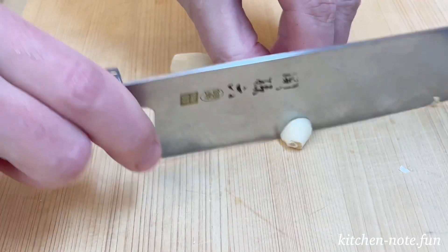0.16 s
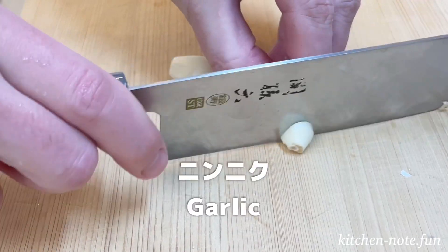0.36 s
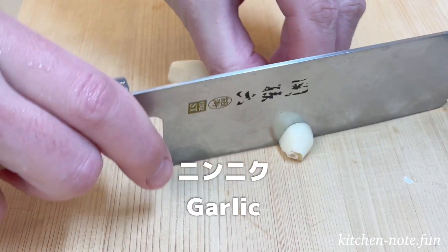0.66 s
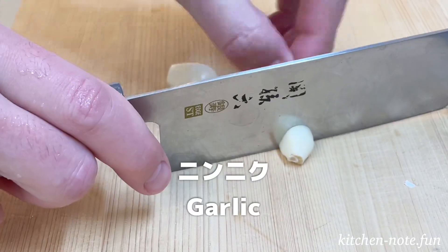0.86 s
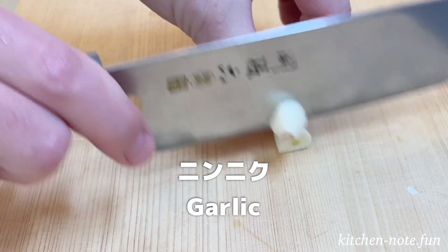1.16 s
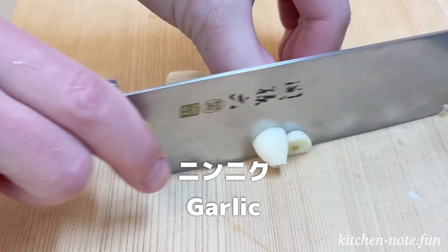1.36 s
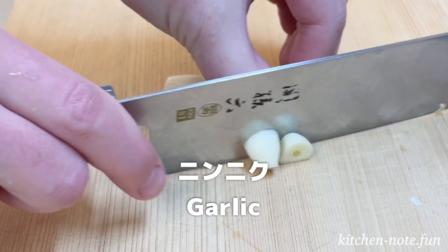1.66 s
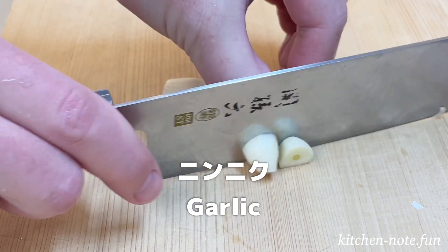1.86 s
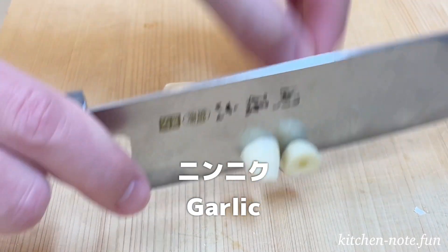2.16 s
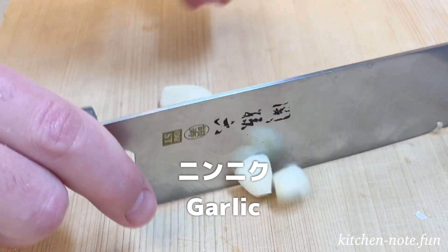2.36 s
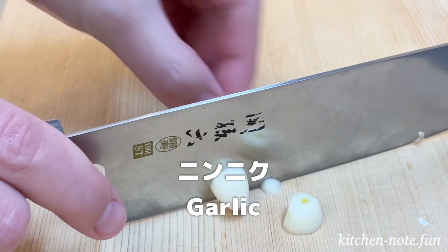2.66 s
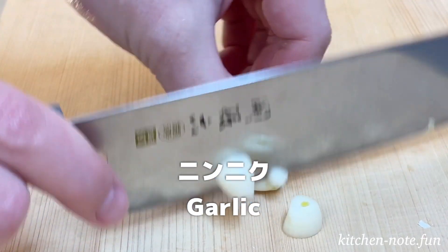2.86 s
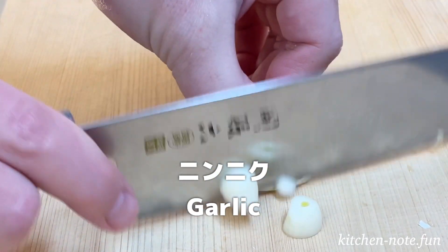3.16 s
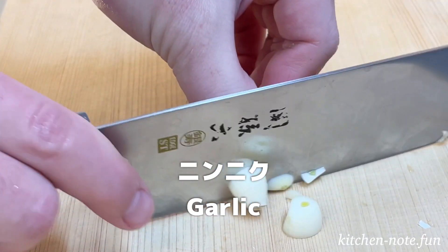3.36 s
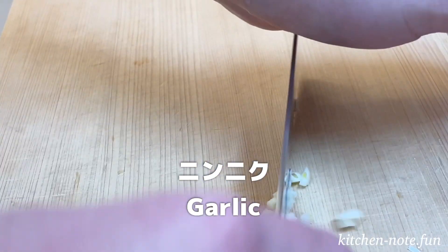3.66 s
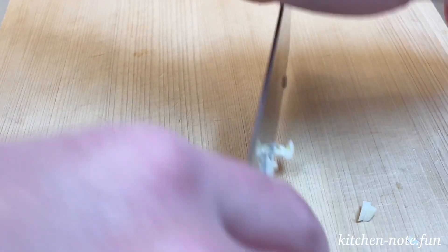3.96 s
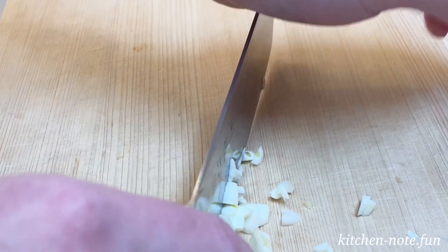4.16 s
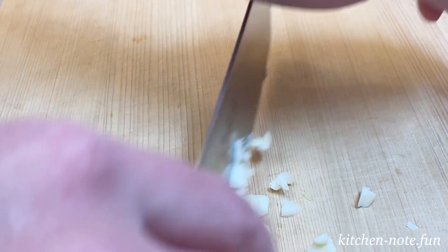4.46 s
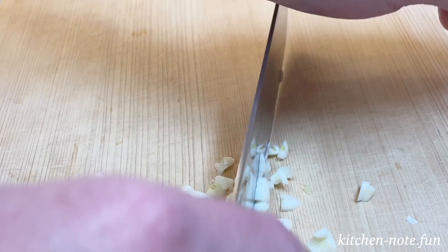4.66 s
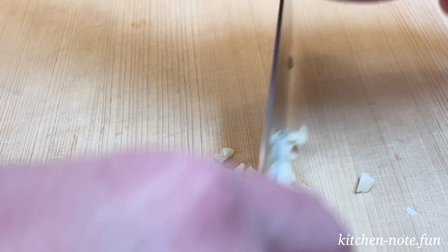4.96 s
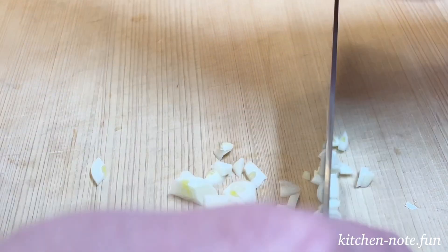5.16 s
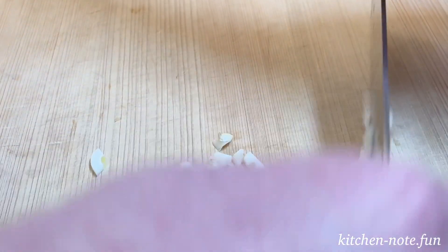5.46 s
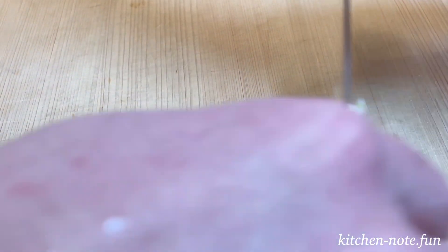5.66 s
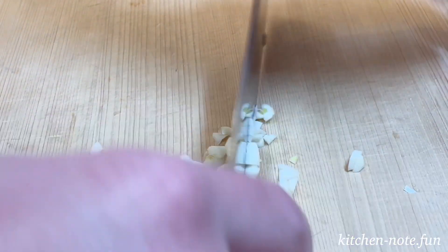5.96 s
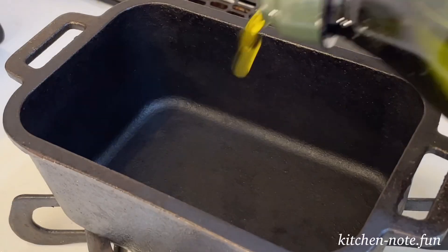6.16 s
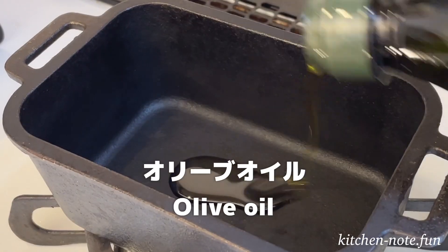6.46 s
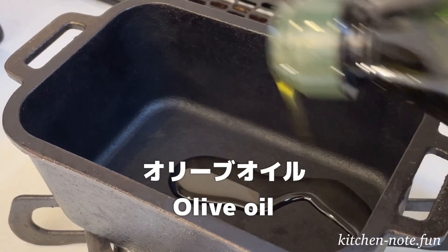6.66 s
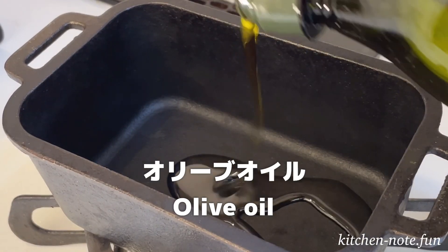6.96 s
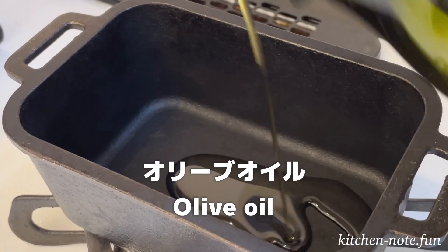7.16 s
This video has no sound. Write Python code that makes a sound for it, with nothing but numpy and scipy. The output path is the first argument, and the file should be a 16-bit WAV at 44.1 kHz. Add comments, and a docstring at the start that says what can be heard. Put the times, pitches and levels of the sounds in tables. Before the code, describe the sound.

Close to the microphone in a small kitchen, a knife slices garlic on a wooden board. Each uneven stroke gives a light snap and crunch, then a sharp, briefly ringing knock, with small wet ticks in between. The strokes turn into steadier, deeper mincing. Near the end the chopping cuts to a faint stove hum with a barely audible trickle of oil. A very faint high whine runs throughout.

```python
"""In a small kitchen, close to the microphone, a knife slices and then minces garlic on a wooden board.
The skin snaps, the clove crunches, and the blade knocks on the board and makes it ring.
Wet pieces tick against the steel, and fingers rub the damp clove. Then the scene changes to a
humming stove, where oil runs almost silently from a bottle into a pan.
A faint electrical whine goes on throughout."""
import sys
import numpy as np
from scipy import signal
from scipy.fft import rfft, irfft, next_fast_len
from scipy.io import wavfile
from scipy.ndimage import uniform_filter1d, minimum_filter1d

SR = 44100
rng = np.random.default_rng(int(sys.argv[2]) if len(sys.argv) > 2 else 0)


def store_pcm(level_fs):
    """Save levels as 16-bit WAV."""
    pcm = np.round(np.clip(level_fs, -1, 1) * 32767).astype(np.int16)
    wavfile.write(sys.argv[1], SR, np.atleast_2d(pcm).T)


N = 321923

# Knife strokes. Each row: landing time in seconds, force in dB, bite (treble of a flat landing) in dB,
# blade buzz in dB, seconds spent in the clove, skin snap in dB, crunch near the board in dB.
STROKES = [(-0.14, 0.5, 6, -12, 0.027, -43, -45), (0.0734, 0, 5, -12, 0.048, -43.5, -32.5),
           (0.3014, 0.2, 3, -11.5, 0.058, -55, -56.5), (0.5719, -1.5, 1, -21, .057, -22, -46),
           (1.3318, 0, 2.5, -15, 0.048, -28, -39), (1.618, 0.5, 1, -11, 0.045, -28.5, -40),
           (2.3327, -1, 2.5, -4.5, 0.013, -54, -28), (3.01, -0.5, 2.5, -1.5, 0.012, -50, -21.5),
           (3.2686, 1, 0, -1.5, 0.047, -24, -31.5), (3.4907, -1.5, 0.5, 0, 0.05, -26, -32),
           (3.8021, -3, -7, -4, .025, -27, -43), (4.0908, 3.5, -1, -11, .040, -60, -35.5),
           (4.3423, 3, -3, -24, 0.0096, -57.5, -50), (4.5834, -1, -8, -12, .015, -34, -42),
           (4.8356, -0.4, -5, -11, .020, -42, -39.5), (5.1515, -3.5, 0.5, -11, 0.025, -43, -38.5),
           (5.476, 2, 4, -1.5, 0.024, -46, -44.5), (5.715, 1, -6.5, -18, 0.0075, -59, -50),
           (5.923, -6.5, -8.5, -19, 0.022, -57, -45)]
# The tones of the board on its counter. A ring time is how long a sound takes to fade by 60 dB.
# Each row: pitch in Hz, ring time in seconds, level in dB when slicing, level in dB when mincing.
BOARD_TONES = [(72.8, 0.58, -36.5, -26), (95.5, 0.15, -24.5, -17.5), (118.3, .55, -34, -24.5),
               (150.1, 0.12, -20, -15.5), (209.3, 0.48, -27.5, -27), (230.6, 0.15, -20.5, -15.5),
               (268.6, 0.22, -22.5, -19.5), (332.7, 0.059, -15.5, -14.5), (350.5, 0.59, -34, -38),
               (420.2, 0.23, -27, -23), (466, 0.24, -30, -22.5), (489, .12, -18.5, -16),
               (613.3, 0.22, -41, -27), (693, 0.032, -21.5, -11.5), (844, 0.45, -29.5, -36.5),
               (875, 0.28, -27.5, -28.5), (935.3, 0.033, -3.5, -1.5), (943, 0.17, -19.5, -20),
               (1055.6, 0.12, -18.5, -20), (1145, .04, -9.5, -16), (1321, .017, 4.5, -7.5),
               (1337, 0.14, -19, -40), (1380, 0.22, -26, -36.5), (1506, 0.085, -21.5, -26),
               (1810, 0.016, -32.5, -16.5), (1878, 0.055, -20, -52.5), (2307, 0.028, -18, -19),
               (2690, 0.014, -28, -25), (3690, .1, -39.5, -45.5), (4500, 0.096, -44, -39.5)]
# Tones of wood and blade, so crowded that they blur into noise.
# Each row: frequency in Hz, level in dB when slicing, level in dB when mincing.
CROWDED_TONES = [(58.7, -30.5, -17), (195, -6.5, -6), (512, -5.5, -1), (930, 7, 4.5), (1326, -2.5, -10),
                 (2080, -3.5, -6), (2910, -17.5, -12.5), (4660, -21.5, -22.5), (7900, -33.5, -32.5),
                 (10100, -34, -38.5), (15640, -52.5, -51)]
# The kitchen's echo. Each row: frequency in Hz, dB added to the crowded tones, ring time in seconds.
KITCHEN_ECHO = [(59, 5, 0.644), (191, -5, 0.51), (463, -6.5, .36), (892, -18.5, 0.39), (1373, -9.5, 0.32),
                (1850, -14.5, 0.23), (4750, -13, .26), (14000, -15.5, 0.2)]
# The tone colour of the crunch. Each row: frequency in Hz, level in dB.
CRUNCH_COLOUR = [(150, -17.5), (700, 11), (1300, 12), (2200, 4.5), (4500, 0.5), (7000, -1), (10500, 0),
                 (12500, -11.5), (15500, -4.5)]
# Wet pieces touch the steel. Each row: start in seconds, level in dB, knock in dB relative to the tick.
WET_TICKS = [(0.6494, -32.5, -26), (0.667, -28.5, 0.5), (1.134, -48, -20), (1.497, -42, -8),
             (1.866, -22.5, -7), (2.776, -40, 4), (3.5636, -38, -8), (3.8225, -33, 10), (5.775, -25.5, -12),
             (5.9913, -32.5, -5)]
# Hand and knife settle. Each row: start in seconds, level in dB, click in dB relative to the bump.
BOARD_NUDGES = [(0.906, -38.5, -6), (2.087, -30, -13.5), (2.798, -38.5, -6), (3.658, -32.5, -10)]
# The tones of the steel blade. Each row: pitch in Hz, level in dB, ring time in seconds.
BLADE_TONES = [(2900, -53, 0.79), (6465, -51.5, 0.1), (7930, -51, .095), (8820, -43, 0.13),
               (9120, -44.5, .085), (11500, -59, 0.084)]
# The background hush at the board and at the stove. Each row: frequency in Hz, relative level in dB.
ROOM_COLOUR = [(20, -37.5), (45, -9), (80, 2), (135, 3.5), (170, -14.5), (220, 2.5), (320, -9.5),
               (650, -14.5), (1200, -13), (1600, -18.5), (3000, -22), (5500, -34), (8000, -43),
               (16000, -48.5)]
STOVE_COLOUR = [(20, -38), (48, -22.5), (72, -1.5), (125, -12), (165, -14), (220, -8.5), (350, -17.5),
                (1200, -19.5), (3000, -29.5), (5500, -39.5), (7000, -47), (16000, -55.5)]
# The stove's electrical hum. Each row: pitch in Hz, level in dB.
HUM_TONES = [(100.1, -43.5), (200.2, -60), (1168, -63.5), (3636, -78)]
# Rubs against the clove. Each row: start in seconds, length in seconds, level in dB.
CLOVE_RUBS = [(1.03, .17, -65), (1.37, 0.24, -66), (2.47, 0.29, -56), (2.766, 0.069, -47.5)]

MINCE_FROM_S, STOVE_FROM_S, OIL_FROM_S = 3.65, 6.066, 6.34
TIME = np.arange(N) / SR


def amp(db):
    """Turn decibels into a number to multiply by."""
    return 10 ** (np.asarray(db) / 20)


def unit(x):
    """Scale a sound to an average (rms) level of 1."""
    return x / np.sqrt(np.mean(x ** 2) + 1e-20)


def peaked(x):
    """Scale a sound so that its peak is 1."""
    return x / np.abs(x).max()


def along(points, hz):
    """Read between (Hz, value) points, with octaves evenly spaced."""
    freqs, values = np.transpose(points)
    return np.interp(np.log(hz + 1), np.log(freqs + 1), values)


def colour(x, points):
    """Turn bass and treble up or down to follow (Hz, dB) points."""
    size = 2 * next_fast_len(len(x) // 2 + 4096)
    cepstrum = irfft(np.log(amp(along(points, np.fft.rfftfreq(size, 1 / SR)))))
    # this fold keeps the filter from ringing before a sound starts
    cepstrum[1:size // 2] *= 2
    cepstrum[size // 2 + 1:] = 0
    return irfft(rfft(x, size) * np.exp(rfft(cepstrum)))[:len(x)]


def ring(t, ring_s):
    """A fade that falls by 60 dB in ring_s seconds."""
    return np.exp(-np.log(1000) * t / ring_s)


def add(track, s, sound):
    """Mix a sound into the track at s seconds."""
    start = round(s * SR)
    sound, start = sound[max(-start, 0):], max(start, 0)
    track[start:start + len(sound)] += sound[:N - start]


def crackle(count):
    """Noise made of half-millisecond bursts of unequal size."""
    sizes = amp(3 * np.minimum(rng.exponential(size=count // 24 + 1), 4))
    return unit(rng.standard_normal(count) * np.repeat(sizes, 24)[:count])


def hush(points, db):
    """Steady background noise with the given tone colour."""
    return amp(db) * unit(colour(rng.standard_normal(N), points))


def whine(hz=13330, width_hz=130):
    """A thin electrical whine: a narrow band of noise, high and steady."""
    size = next_fast_len(N)
    band = np.exp(-((np.fft.rfftfreq(size, 1 / SR) - hz) / width_hz) ** 2)
    return amp(-87) * unit(irfft(rfft(rng.standard_normal(size)) * band, size)[:N])


def board_ring(t, mincing, scatter_db, rise_cycles):
    """The struck board rings; low tones travel slowly through the wood, so they build up last."""
    hz, ring_s, *levels = np.transpose(BOARD_TONES)[:, :, None]
    gain = amp(levels[mincing] + scatter_db * rng.standard_normal(hz.shape))
    signs = (-1) ** np.arange(len(hz))[:, None]
    rise = 1 - np.exp(-t * hz / rise_cycles)
    return np.sum(gain * signs * np.sin(2 * np.pi * hz * t) * ring(t, ring_s) * rise, axis=0)


def echo_tail(count):
    """The kitchen's echo: noise in which each frequency fades at its own speed."""
    hz, t, spectrum = signal.stft(rng.standard_normal(count), SR, nperseg=256)
    ring_s = along(np.array(KITCHEN_ECHO)[:, ::2], hz)[:, None]
    return signal.istft(spectrum * amp(-60 * t / ring_s), SR)[1][:count]


def blade_buzz(t):
    """After landing, the thin blade chatters on the wood for a few milliseconds."""
    swell = np.maximum(t - .0015, 0) / 0.0032
    chatter = rng.standard_normal(len(t)) * swell * np.exp(1 - swell)
    return colour(chatter, [(900, -19), (2400, -19), (4000, -17), (7500, -23.5), (11000, -35),
                            (13000, -47.5), (16000, -42)])


def chops():
    """The edge hits the wood with a crack; the board rings and the room answers."""
    out, t = np.zeros(N), np.arange(SR // 2) / SR
    crowded, echo = np.array(CROWDED_TONES), np.array(KITCHEN_ECHO)
    # blows on the same spot share much of their ring: one spot for slicing, one for mincing
    spots = [echo_tail(len(t)) for _ in range(2)]
    for s, force_db, bite_db, buzz_db, *_ in STROKES:
        mincing = int(s > MINCE_FROM_S)
        crack = colour(rng.standard_normal(len(t)) * ring(t, 0.0077),
                       [(800, -29.5), (2200, 10), (4800, 1.5), (9000, -24), (16000, -29)])
        early = rng.standard_normal(len(t)) * ring(t, 0.056) * np.minimum(t / 0.0026, 1)
        tail = (spots[mincing] + echo_tail(len(t))) / np.sqrt(2)
        late = colour(tail, echo[:, :2]) * (1 - np.exp(-t / 0.002))
        wash = colour(early + late, crowded[:, [0, 1 + mincing]])
        blow = amp(-11.5) * crack + board_ring(t, mincing, scatter_db=2.5, rise_cycles=0.42) + wash
        # a light blow stays longer on the wood and sounds rounder; a flat one pushes the whole board
        thump_db = -3.5 - 0.69 * force_db + 0.63 * bite_db
        body_db = -0.05 - 0.8 * force_db
        balance = [(110, thump_db), (330, body_db), (750, 0), (1400, 0), (2400, bite_db)]
        # the knife, pressed down again, damps what still rings from before
        out *= ring(np.clip(TIME - s, 0, 1), .08)
        add(out, s, amp(force_db) * (colour(blow, balance) + amp(buzz_db) * blade_buzz(t)))
    return out


def snaps(events, bright_hz):
    """Snapping skin or a wet piece on the steel: a sharp tick that passes a knock down to the board."""
    out, t = np.zeros(N), np.arange(SR // 4) / SR
    brightness = [(300, -22), (bright_hz / 3, -7), (bright_hz, 0),
                  (11000, -4), (12500, -12), (16000, -10)]
    for s, db, knock_db in events:
        burst = rng.standard_normal(len(t)) * ring(t, 0.026) * (1 - np.exp(-t / 0.00033))
        snap = colour(burst, brightness)
        wood = board_ring(t, mincing=0, scatter_db=3.5, rise_cycles=0.97)
        knock = colour(wood, [(200, -0.5), (1200, -4.5)])
        add(out, s, amp(db) * (peaked(snap) + amp(knock_db) * peaked(knock)))
    return out


def skin_snaps():
    """The garlic's skin snaps as the edge enters, just before each chop."""
    knock_db = 1
    entries = [(s - cut_s, snap_db, knock_db) for s, *_, cut_s, snap_db, crunch_db in STROKES]
    return snaps(entries, bright_hz=6000)


def crunch():
    """The clove's cells burst until the edge reaches the board."""
    out = np.zeros(N)
    for s, *_, cut_s, snap_db, crunch_db in STROKES:
        count = int((cut_s + .003) * SR)
        entry_db = -32.5 + .38 * snap_db  # tough skin snaps louder and starts a stronger crunch
        add(out, s - cut_s, amp(np.linspace(entry_db, crunch_db, count)) * crackle(count))
    return colour(out, CRUNCH_COLOUR)


def walls(x, echo_db):
    """The kitchen walls add a short echo to a sound."""
    tail = echo_tail(SR // 2)
    return x + amp(echo_db) * signal.fftconvolve(x, tail / np.linalg.norm(tail))[:N]


def blade_ping(start_s=0.428):
    """The lifted blade rings once, faintly."""
    out, t = np.zeros(N), np.arange(SR // 4) / SR
    tones = sum(amp(db) * np.sin(2 * np.pi * hz * t) * ring(t, ring_s) for hz, db, ring_s in BLADE_TONES)
    add(out, start_s, tones * (1 - np.exp(-t / 0.001)))
    return out


def nudges():
    """Soft touches wake the board's low tones, with a faint click of the edge."""
    out, t = np.zeros(N), np.arange(SR // 2) / SR
    # after each mincing stroke the edge pulls free of the wood
    lifts = [(s + .089, -27.5, -14) for s, *_ in STROKES if s > MINCE_FROM_S]
    for s, db, click_db in BOARD_NUDGES + lifts:
        wood = board_ring(t, mincing=1, scatter_db=0.5, rise_cycles=1)
        bump = colour(wood, [(60, 10), (250, 2), (480, -3.5), (700, -2), (950, -17), (5000, -1)])
        click = colour(rng.standard_normal(len(t)) * ring(t, 0.031),
                       [(500, -9), (2000, 8), (5000, -6), (14000, -28)])
        add(out, s, amp(db) * (peaked(bump) + amp(click_db) * peaked(click)))
    return out


def rubs():
    """Fingers and blade slide on the damp clove, louder as they speed up and softer as they slow."""
    rub = unit(colour(crackle(N), [(500, -5), (3000, -4.5), (9000, -7.5), (12500, -13.5), (16000, -7.5)]))
    speed = sum(amp(db) * np.interp(TIME, [s, s + .3 * length, s + length], [0, 1, 0])
                for s, length, db in CLOVE_RUBS)
    return speed * rub


def stove():
    """Mains electricity hums, and a fan moves air with a low drone."""
    hum = sum(amp(db) * np.sin(2 * np.pi * (hz * TIME + rng.random())) for hz, db in HUM_TONES)
    air = hush(STOVE_COLOUR, db=-54)
    drone = hush([(150, -36), (205, 2.5), (235, -2.5), (330, -26), (800, -57)], db=-57.5)
    return hum + air + drone


def oil(every_s=0.177, width_s=0.033):
    """Oil trickles from the bottle in soft, evenly spaced surges."""
    trickle = colour(crackle(N), [(300, -27), (800, 1), (1250, 5), (2500, -6.5),
                                  (6000, -18), (16000, -40.5)])
    flow = sum(np.exp(-((TIME - s) / width_s) ** 2) for s in np.arange(OIL_FROM_S, N / SR, every_s))
    return amp(-58.5) * flow * unit(trickle)


def scene():
    """First the cutting board, then the stove, with the whine over both."""
    cutting = hush(ROOM_COLOUR, db=-50.5) + chops() + nudges()
    garlic = crunch() + rubs() + skin_snaps() + snaps(WET_TICKS, bright_hz=4360)
    cutting += walls(garlic + blade_ping(), echo_db=-9.5)
    cooking = stove() + oil()
    return (np.where(TIME < STOVE_FROM_S, cutting, cooking) + whine())[None]


def record(dry, top_hz=16300, edge_hz=600):
    """The microphone drops deep rumble, a limiter turns down loud peaks, and the top treble is cut."""
    x = signal.sosfilt(signal.butter(2, 46, "highpass", fs=SR, output="sos"), dry)
    needed_gain = np.minimum(1, .92 / (np.abs(x) + 1e-9))
    smooth_gain = uniform_filter1d(minimum_filter1d(needed_gain, size=65), size=65)
    size = next_fast_len(N + SR)
    treble_cut = np.clip((top_hz - np.fft.rfftfreq(size, 1 / SR)) / edge_hz, 0, 1)
    return irfft(rfft(x * smooth_gain, size) * treble_cut, size)[:, :N]


dry = scene()
out = record(dry)
store_pcm(out)
```